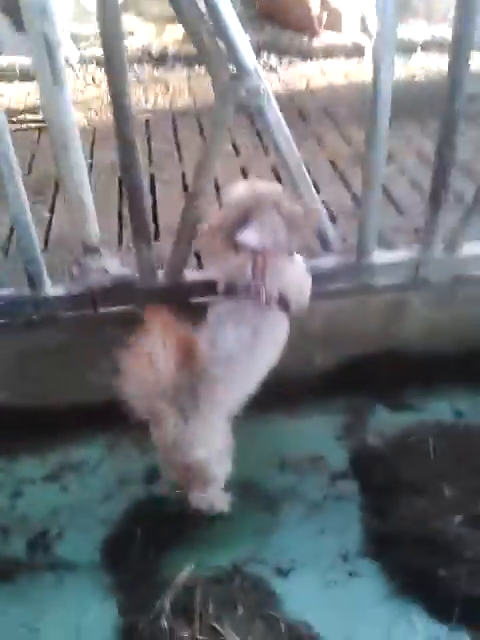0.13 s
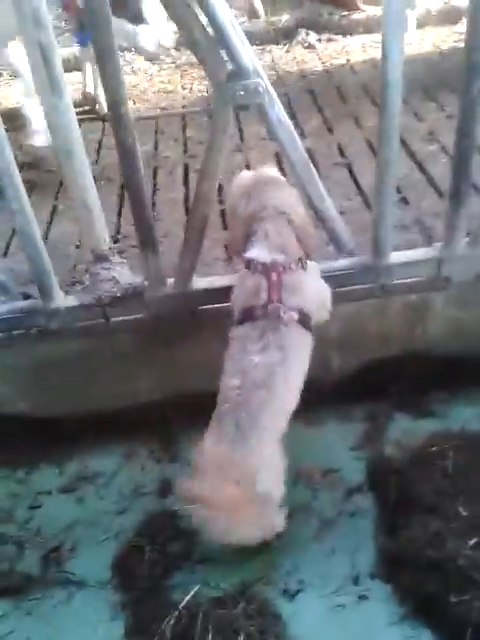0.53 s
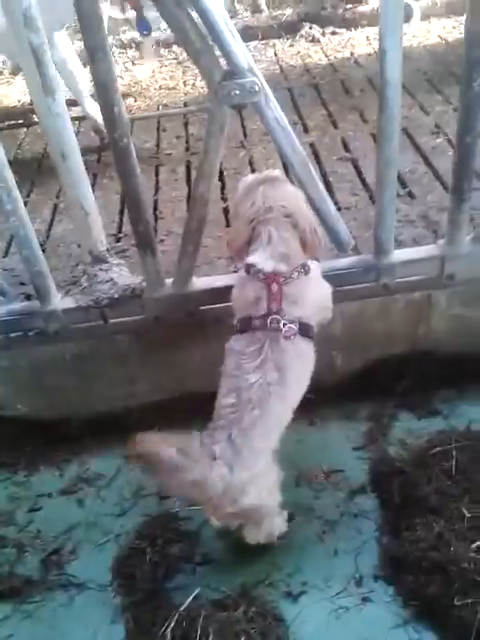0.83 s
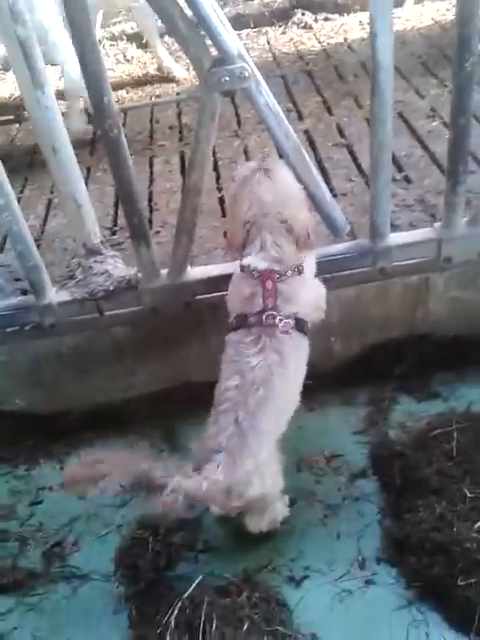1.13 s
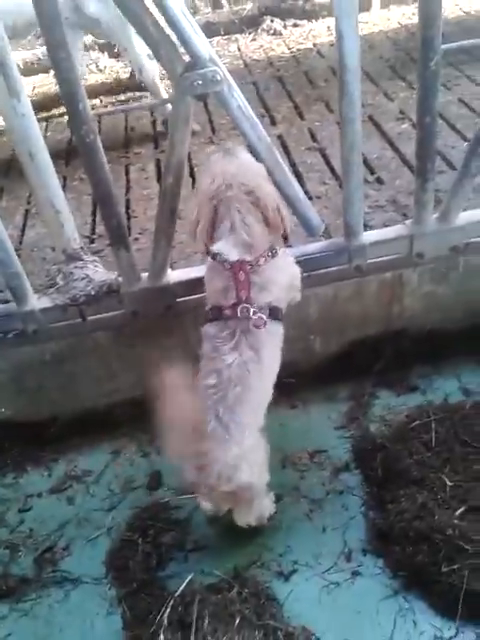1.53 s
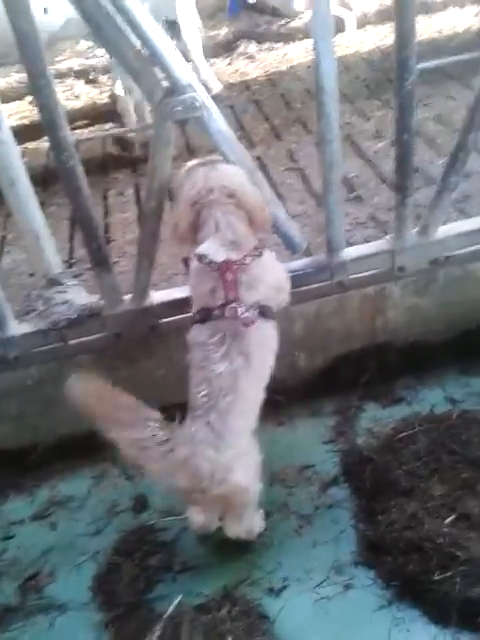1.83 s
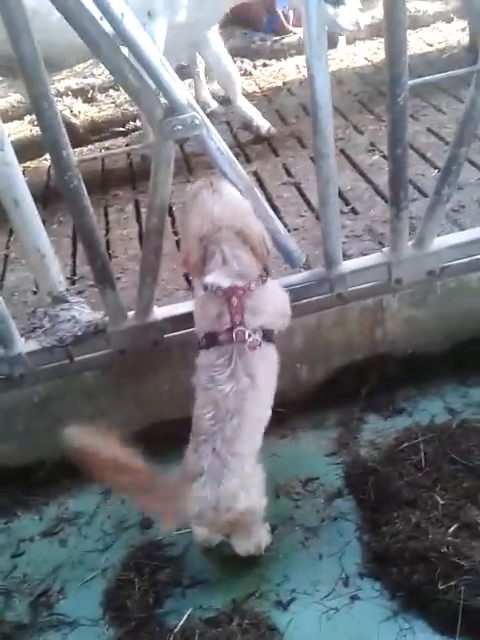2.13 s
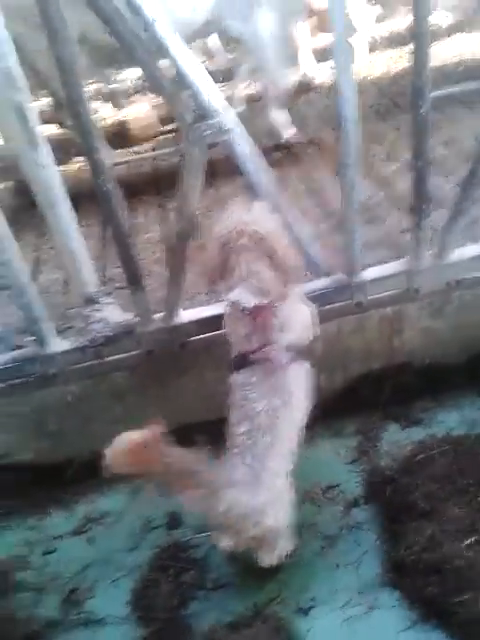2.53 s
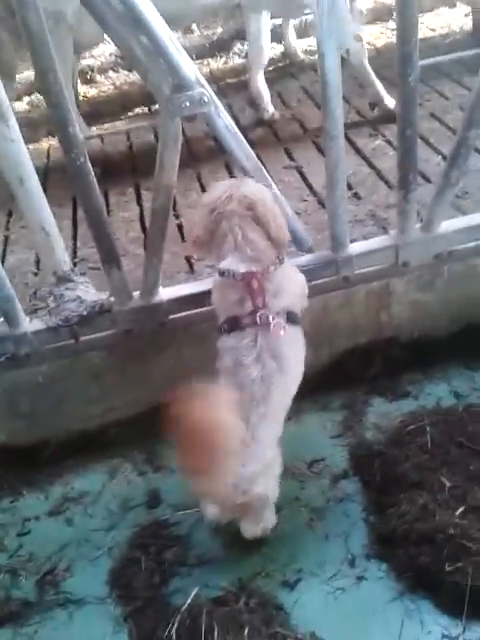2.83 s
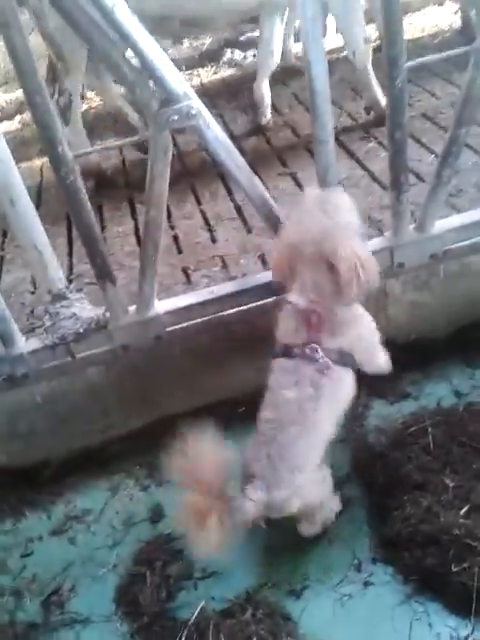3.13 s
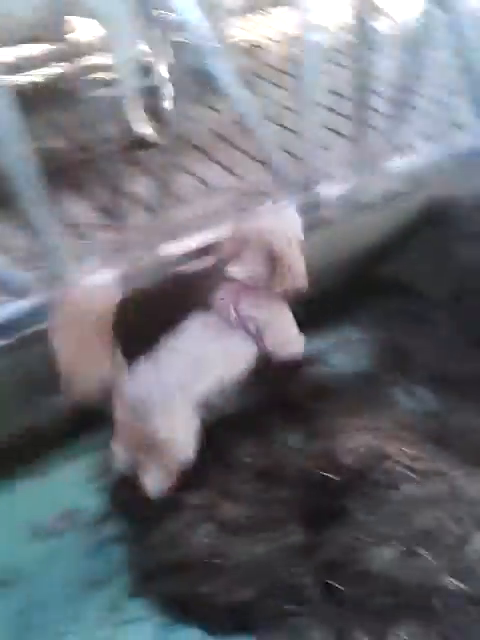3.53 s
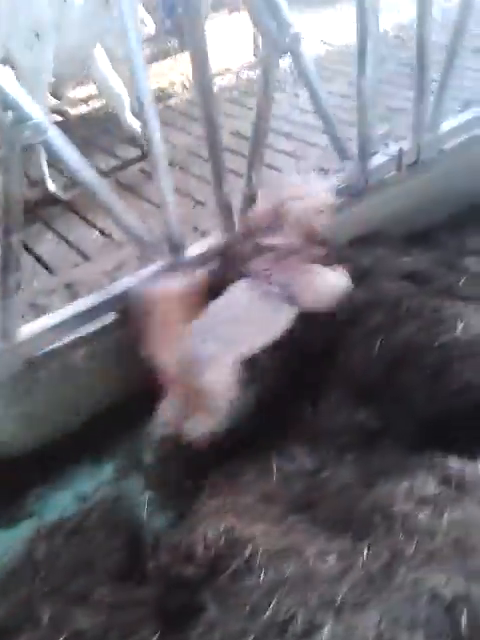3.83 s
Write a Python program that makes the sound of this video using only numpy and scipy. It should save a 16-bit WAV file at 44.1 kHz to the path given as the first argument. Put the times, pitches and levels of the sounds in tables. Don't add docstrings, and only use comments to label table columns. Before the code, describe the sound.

A small dog barks hoarsely at about 0.3, 1.0, 1.3, 2.1, 3.1 and 3.3 seconds, the fifth loudest, each ringing through a large barn. Sparrows chirp near and far throughout, clearly at 0.3, 1.6, 2.6 and 3.9. Metal ticks snap at 0.7 and 1.9; hooves scuff dully around 2 and 3; harness tags jingle faintly near 3.7. Steady airy hush, thin bass, slightly overloaded phone microphone.

```python
import sys
import numpy as np
from scipy import signal
from scipy.io import wavfile

SR = 44100
rng = np.random.default_rng(int(sys.argv[2]) if len(sys.argv) > 2 else 0)


def decibels_to_gain(level_db):
    exponent = np.asarray(level_db, float) / 20
    return 10 ** exponent


def materialize(psi):
    bounded = np.clip(np.atleast_2d(psi).T, -1, 1)
    quanta = np.round(bounded * 32767).astype(np.int16)
    wavfile.write(sys.argv[1], SR, quanta)


N = 176400
LEAD = SR // 2
M = N + LEAD


def at_hz(points, hz):
    table_hz, values = np.array(points).T
    return np.interp(np.log(hz), np.log(table_hz), values)


def rms_one(x):
    return x / np.sqrt(np.mean(x ** 2) + 1e-20)


def drift(rate_hz, size):
    r = np.exp(-2 * np.pi * rate_hz / SR)
    x = signal.lfilter([1], [1, -2 * r, r * r], rng.standard_normal(size + SR // 4))[SR // 4:]
    return x / x.std()


def resonate(x, hz, width_hz):
    r = np.exp(-np.pi * width_hz / SR)
    poles = [1, -2 * r * np.cos(2 * np.pi * hz / SR), r * r]
    return signal.lfilter([(1 - r * r) / 2, 0, (r * r - 1) / 2], poles, x)


def resonate_twice(x, hz, width_hz):
    return rms_one(resonate(resonate(x, hz, width_hz), hz, width_hz))


def ring(hz, t60):
    t = np.arange(SR // 3) / SR
    return np.sin(2 * np.pi * hz * t) * decibels_to_gain(-60 * t / t60)


def add(out, s, x):
    i = LEAD + int(s * SR)
    out[i:i + len(x)] += x[:M - i]


def noise_bands():
    edges = 60 * 2 ** np.arange(0, 8.6, .5)
    white = rng.standard_normal((2, M))
    result = []
    for k, (low, high) in enumerate(zip(edges, edges[1:])):
        band = signal.butter(2, [low, high], "band", fs=SR, output="sos")
        result.append((np.sqrt(low * high), signal.sosfilt(band, white[k % 2])))
    return result


def hush():
    # frequency in Hz, level in dB per Hz.
    spectrum = [(150, -13), (350, -13.5), (650, -13), (1500, -7.5), (2500, -11), (4500, -1.5),
                (7000, -16.5), (14000, -48)]
    level_db, patchy_db = -31.5, 2
    air = sum(decibels_to_gain(at_hz(spectrum, hz) + patchy_db * drift(6.8, M)) * noise for hz, noise in noise_bands())
    return decibels_to_gain(level_db) * rms_one(air)


def sparrow_whistles(rows):
    rise_share, rise_from, fall_bend = 0.1494, 0.93, 1.8
    trill_hz, trill_depth, trill_swing, flutter_depth = 210, .9, .035, .025
    out, flutter = np.zeros(M), drift(135, M)
    for (s, length, db, top_hz, end_hz), (a, b) in zip(rows, rng.random((len(rows), 2))):
        t = np.arange(int(length * SR)) / SR
        u = t / length
        throb = np.sin(2 * np.pi * (trill_hz * (0.64 + 0.444 * a) * t + b))
        rise = np.minimum(rise_from + (1 - rise_from) * u / rise_share, 1)
        hz = top_hz * rise - (top_hz - end_hz) * u ** fall_bend
        unsteady = trill_swing * throb + flutter_depth * flutter[int(a * N):][:len(t)]
        phase = 2 * np.pi * np.cumsum(hz * (1 + unsteady)) / SR
        shape = np.minimum(u / rise_share, 1) ** 2 * (1 - u) ** 0.2
        add(out, s, decibels_to_gain(db) * np.sin(phase) * (1 + trill_depth * throb) * shape)
    return out


def far_flock():
    count, floor_db, bird_hz = 60, -52.5, 4700
    rows = [(-.45 + 4.4 * a, 0.036 + 0.044 * b, floor_db + 10 * c,
             bird_hz * (0.72 + 0.2 * d), bird_hz * (0.23 + 0.68 * e))
            for a, b, c, d, e in rng.random((count, 5))]
    return sparrow_whistles(rows)


def rafters(x):
    spread_s, echo_db = .06, -6
    echoes, draw = np.zeros(int(spread_s * SR) + 1), rng.random((24, 2))
    places = (draw[:, 0] * spread_s * SR).astype(int)
    echoes[places] = decibels_to_gain(echo_db - 5.85 * draw[:, 0]) * (2 * draw[:, 1] - 1)
    return x + signal.fftconvolve(x, echoes)[:M]


def near_sparrows():
    # start in seconds, length in seconds, level in dB, top in Hz, end in Hz.
    chirps = [(-.06, 0.076, -21.5, 4700, 3060), (.333, 0.05, -15, 5140, 3333),
              (.765, .06, -30.5, 4700, 2780), (1.165, 0.067, -26, 4854, 3910),
              (1.41, 0.049, -49, 4500, 4250), (1.552, 0.012, -33.5, 5300, 4800),
              (1.568, 0.026, -33, 4100, 4284), (1.584, 0.018, -19, 4900, 2920),
              (1.62, 0.013, -26, 2800, 2620), (1.93, 0.05, -25, 5500, 3480),
              (1.975, .04, -38.5, 7020, 4700), (2.58, 0.053, -17.5, 4950, 3226),
              (3.19, 0.014, -25, 3540, 3400), (3.26, 0.038, -33, 3500, 3270), (3.4, 0.038, -43, 3400, 3080),
              (3.53, 0.027, -24.5, 3500, 2900), (3.93, 0.052, -12, 4880, 3334)]
    return rafters(sparrow_whistles(chirps))


def dog():
    # start in seconds, length in seconds, level in dB, attack in seconds.
    barks = [
        (0.323, 0.2, -0.5, 0.071),
        (1.023, .14, -1, 0.038),
        (1.261, 0.17, -6, 0.027),
        (2.106, 0.17, -2.5, 0.052),
        (3.066, 0.15, 0.5, 0.041),
        (3.329, 0.13, -3.5, 0.023),
    ]
    # start in Hz, top in Hz, place of the top (0-1), end in Hz.
    arches = [(560, 710, .8, 600), (560, 720, .4, 560), (600, 690, .5, 550), (430, 685, .5, 570),
              (580, 650, .62, 490), (600, 765, .38, 540)]
    # second resonance in Hz, its level in dB, third resonance in Hz,
    # its level in dB, hoarse air in dB.
    mouths = [(1147, -10.5, 2130, -11.5, -6), (1097, -6, 1600, -15, -6), (1032, -3, 1590, -10, -5),
              (1075, -7.5, 1546, -12, -5), (1103, -8, 1688, -11, -7.5), (1074, -24, 1950, -20.5, -9)]
    wobble, wobble_hz, shimmer_db, shimmer_hz = .035, 35, 1.5, 50
    throat_hz, throat_width_hz, mouth_width_hz, nose_width_hz = 649, 399, 274, 183
    rasp_hz, rasp_width_hz, rasp_db = 2520, 2160, -16.5
    throat_air_db, mouth_air_db, third_harmonic_db = -1, 13, -19
    release_s, opening = 0.059, 1.1
    out, t = np.zeros(M), np.arange(SR // 4) / SR
    for (s, length, db, attack), (start_hz, top_hz, top_at, end_hz), mouth in zip(barks, arches, mouths):
        mouth_hz, mouth_db, nose_hz, nose_db, air_db = mouth
        u = np.clip(t / length, 0, 1)
        rise = np.minimum(u / top_at, 1)
        fall = np.maximum(u - top_at, 0) / (1 - top_at)
        hz = start_hz + (top_hz - start_hz) * np.sin(np.pi / 2 * rise) - (top_hz - end_hz) * fall ** 1.5
        phase = 2 * np.pi * np.cumsum(hz * (1 + wobble * drift(wobble_hz, len(t)))) / SR
        shimmer = decibels_to_gain(shimmer_db * drift(shimmer_hz, len(t)))
        pulses = sum(np.cos(k * phase) for k in range(2, 7)) * shimmer
        air = rng.standard_normal(len(t)) * (1 + np.cos(phase))
        folds = rms_one(pulses) + decibels_to_gain(air_db + mouth_air_db) * rms_one(air)

        tone = (np.cos(phase) - decibels_to_gain(third_harmonic_db) * rise * np.cos(3 * phase)) * shimmer
        throat = decibels_to_gain(air_db + throat_air_db) * resonate_twice(air, throat_hz, throat_width_hz)
        mouth_sound = decibels_to_gain(mouth_db) * resonate_twice(folds, mouth_hz, mouth_width_hz)
        nose = decibels_to_gain(nose_db) * resonate_twice(folds, nose_hz, nose_width_hz)
        rasp = decibels_to_gain(rasp_db) * resonate(folds, rasp_hz, rasp_width_hz)
        voice = tone + throat - mouth_sound + (nose - rasp) * rise ** opening
        shape = np.clip(t / attack, 0, 1) ** 2 * np.clip((length - t) / release_s, 0, 1)
        add(out, s, decibels_to_gain(db) * voice * shape)
    return out


def latch():
    # start in seconds, peak in dB, ring in Hz.
    ticks = [
        (0.665, -4, 4160),
        (.670, -12.5, 4330),
        (1.903, -6, 3500),
        (1.9057, -11.5, 4500),
        (2.843, -30, 8700),
        (2.953, -20, 6400),
        (3.814, -23.5, 8900),
    ]
    t60_s, crack_db = 0.01, -14.5
    out = np.zeros(M)
    for (s, db, hz), noise in zip(ticks, rng.standard_normal((len(ticks), SR // 3))):
        add(out, s, decibels_to_gain(db) * ring(hz, t60_s) * (1 + decibels_to_gain(crack_db) * noise))
    return out


def cattle():
    # start in seconds, length of the full swell in seconds (only its first 0.2 s sounds), #
    # level in dB, centre in Hz, width in Hz.
    shuffles = [
        (1.99, 0.15, -32, 1640, 2500),
        (2.0, 0.33, -32.5, 470, 570),
        (2.92, 0.42, -31.5, 310, 560),
        (3.6, 0.12, -43.5, 270, 205),
        (2.3, 0.095, -64, 263, 258),
    ]
    out, t = np.zeros(M), np.arange(SR // 5) / SR
    grits = rng.standard_normal((len(shuffles), len(t)))
    for (s, length, db, hz, width_hz), grit in zip(shuffles, grits):
        swell = np.sin(np.pi * np.clip(t / length, 0, 1) ** 0.83)
        add(out, s, decibels_to_gain(db) * swell * resonate_twice(grit, hz, width_hz))
    return out


def harness_tags():
    # start in seconds, peak in dB.
    touches = [
        (3.031, -42),
        (3.654, -28),
        (3.661, -25),
        (3.667, -29),
        (3.678, -22),
        (3.729, -31),
        (3.791, -31),
        (3.846, -29),
    ]
    # frequency in Hz, level in dB, t60 in seconds.
    modes = [(8600, -12, .02), (9500, -7, .03), (9950, -27, .2), (10950, -22, .18), (13800, -26, .08),
             (15450, -18, .08)]
    out = np.zeros(M)
    for (s, db), luck_db in zip(touches, rng.normal(0, 2.1, (len(touches), len(modes)))):
        jingle = sum(decibels_to_gain(db + mode_db + d) * ring(hz, t60) for (hz, mode_db, t60), d in zip(modes, luck_db))
        add(out, s, jingle)
    return out


def barn(x):
    # frequency in Hz, t60 in seconds.
    decay = [(200, 0.53), (600, 2.09), (1200, 1.84), (2500, 1.27), (5000, 2.1), (10000, .35)]
    build_s = .04
    t = np.arange(M) / SR
    tail = np.zeros(M)
    for hz, noise in noise_bands():
        t60 = at_hz(decay, hz)
        tail += noise * decibels_to_gain(-60 * t / t60) / np.sqrt(t60)
    tail = tail * (1 - np.exp(-t / build_s)) * np.sqrt(6 * np.log(10) / SR)
    return signal.fftconvolve(x, tail)[:M]


def scene():
    dog_wet_db, bird_wet_db, bits_wet_db = -5, -5, -7
    far, birds, voice = far_flock(), near_sparrows(), dog()
    bits = latch() + cattle() + harness_tags()
    wet = barn(decibels_to_gain(dog_wet_db) * voice + decibels_to_gain(bird_wet_db) * birds + decibels_to_gain(bits_wet_db) * bits + far)
    return (voice + birds + bits + wet + hush())[None, LEAD:]


def low_pass(x):
    return signal.sosfilt(signal.butter(12, 15760, fs=SR, output="sos"), x)


def record(dry):
    bass_cut_hz, treble_cut_hz = 210, 15800
    limit_db, recover_db_per_s, grab_s = 0, 154, .004
    ceiling, lopsided, knee = .73, .004, 8.0
    x = signal.sosfilt(signal.butter(6, bass_cut_hz, "high", fs=SR, output="sos"), dry)

    ramp = recover_db_per_s * np.arange(N) / SR
    peak_db = np.maximum.accumulate(20 * np.log10(np.abs(x) + 1e-9) + ramp, axis=1) - ramp
    over_db = np.maximum(peak_db - limit_db, 0)
    r = np.exp(-1 / (grab_s * SR))
    x = x * decibels_to_gain(-signal.lfilter([1 - r], [1, -r], over_db))

    side_ceiling = ceiling * (1 + lopsided * np.sign(x))
    x = x / (1 + np.abs(x / side_ceiling) ** knee) ** (1 / knee)
    x = signal.sosfilt(signal.cheby2(12, 60, treble_cut_hz, fs=SR, output="sos"), x)
    return low_pass(x)


dry = scene()
out = record(dry)
materialize(out)
```